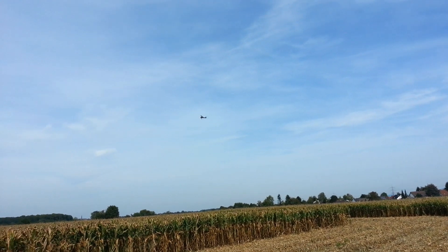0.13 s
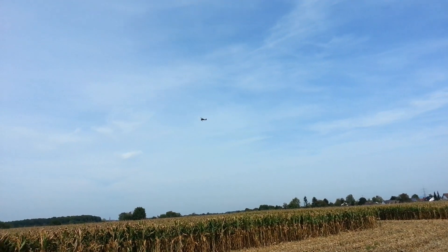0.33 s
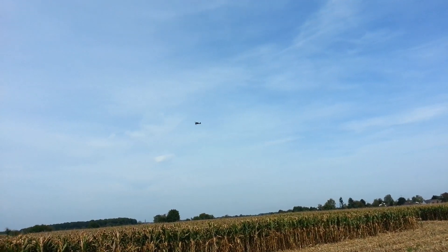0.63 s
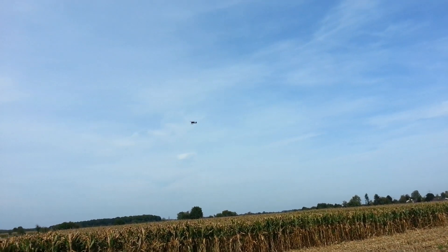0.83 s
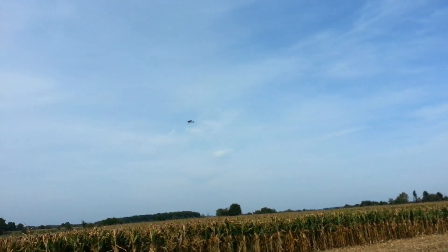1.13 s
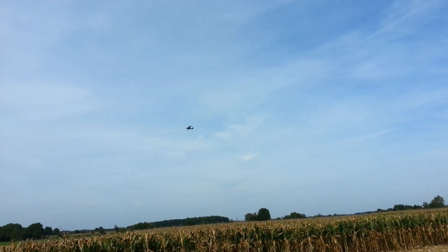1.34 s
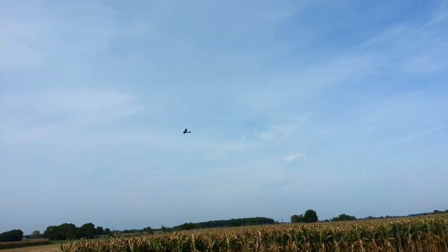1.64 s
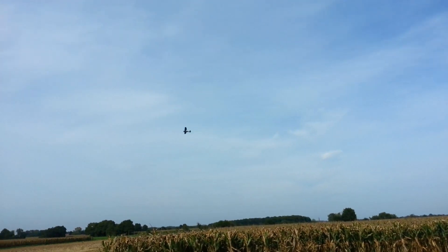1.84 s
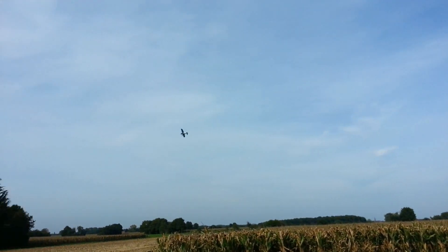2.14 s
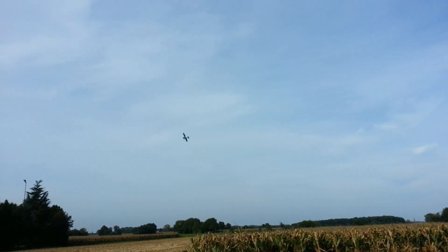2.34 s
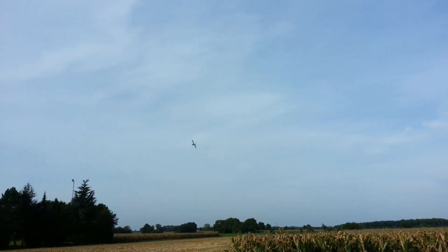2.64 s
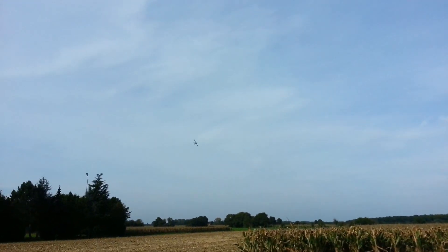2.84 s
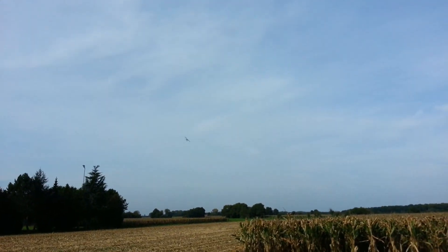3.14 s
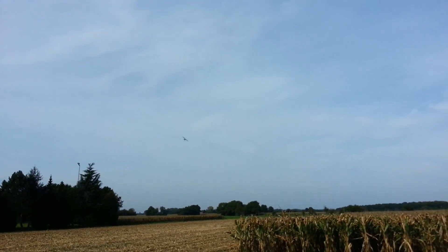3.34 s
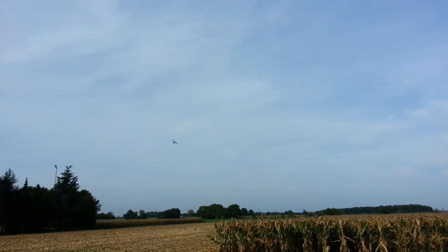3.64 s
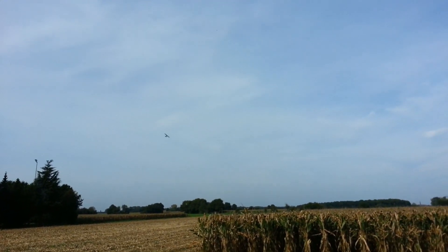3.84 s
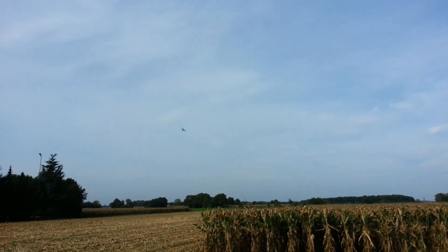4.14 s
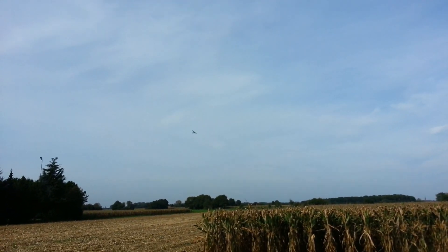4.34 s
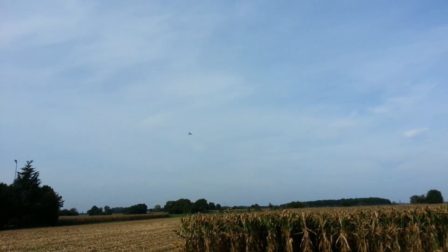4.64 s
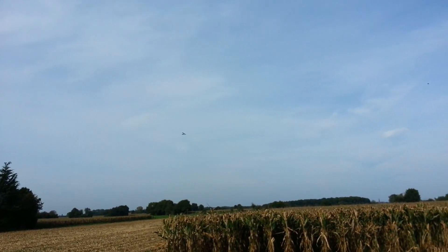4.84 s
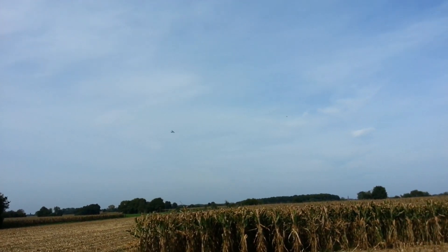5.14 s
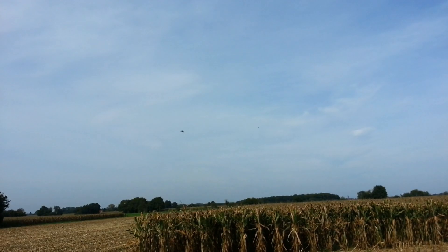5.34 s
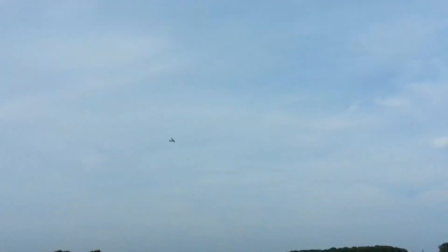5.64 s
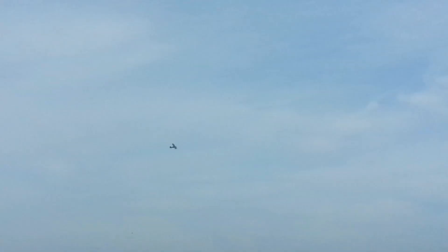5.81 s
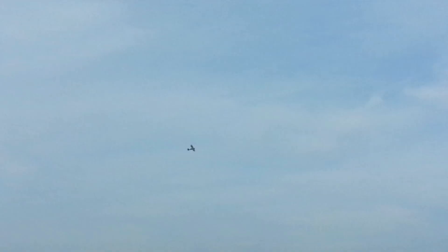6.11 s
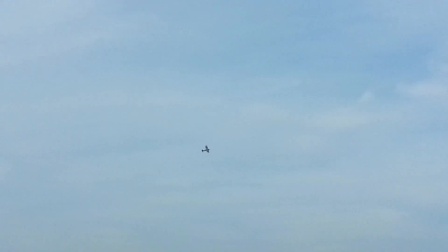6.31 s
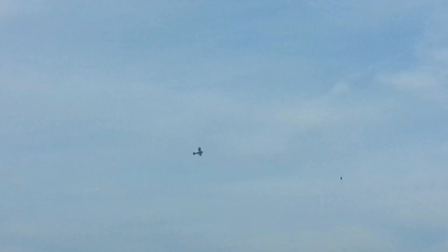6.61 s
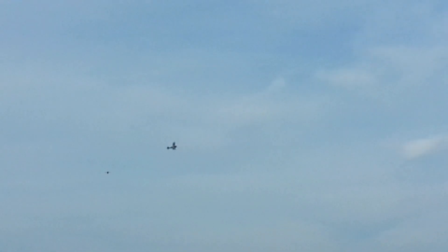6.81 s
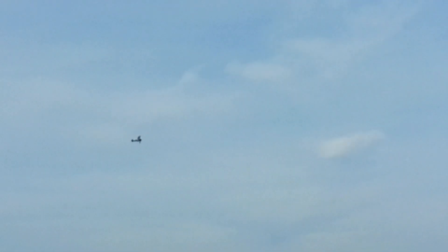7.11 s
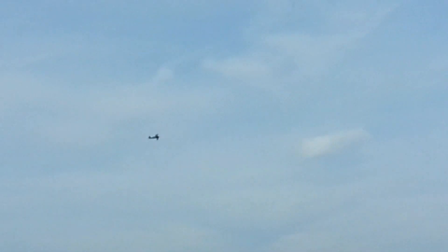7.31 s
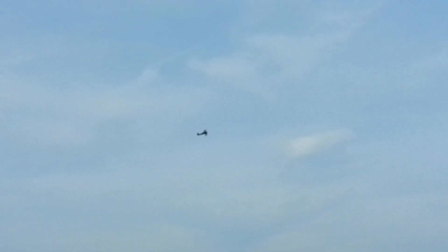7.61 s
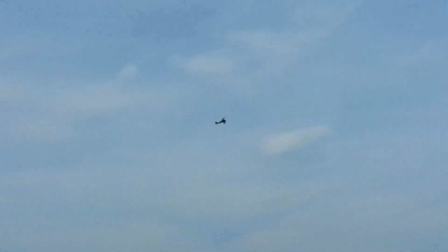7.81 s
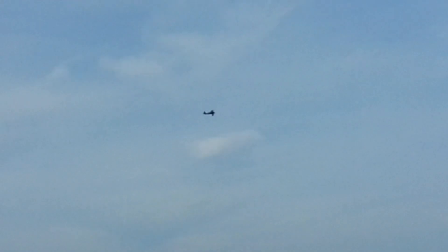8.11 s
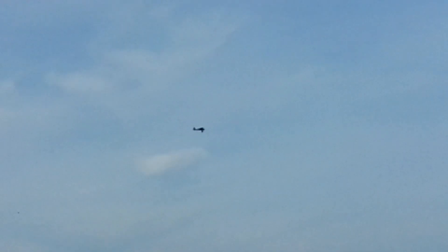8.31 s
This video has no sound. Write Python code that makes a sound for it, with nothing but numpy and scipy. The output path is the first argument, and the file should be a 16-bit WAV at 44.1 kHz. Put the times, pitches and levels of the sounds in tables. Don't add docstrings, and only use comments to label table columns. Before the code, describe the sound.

Outdoors over open fields, a small model plane approaches with a breathy, rushing roar. It swells from about two seconds, crackling sharply as it swings from right to left, then drops away. Hard finger clicks hit the camera shell just after the loudest moment, another knock follows, and low wind puffs thump mainly on the left while the distant roar thins and faint hiss emerges.

```python
import sys
import numpy as np
from scipy import signal
from scipy.fft import rfft, irfft, next_fast_len
from scipy.io import wavfile
from scipy.ndimage import uniform_filter1d, map_coordinates

SR = 44100
rng = np.random.default_rng(int(sys.argv[2]) if len(sys.argv) > 2 else 0)


def int16_out(signal):
    q = np.round(np.clip(np.atleast_2d(signal).T, -1, 1) * 32767)
    wavfile.write(sys.argv[1], SR, q.astype(np.int16))


def linear_from_db(decibels):
    return 10 ** (np.asarray(decibels, float) / 20)


N = 373086


def along(points, hz):
    f, *cols = np.transpose(points)
    return np.array([np.interp(np.log(hz + 1), np.log(f + 1), c) for c in cols])


def curves(rows, t=None):
    s, *cols = np.transpose(rows)
    t = np.arange(N) / SR if t is None else t
    return np.array([np.interp(t, s, c) for c in cols])


def unit(x):
    return x / np.sqrt(np.mean(x ** 2, axis=-1, keepdims=True) + 1e-20)


def wobble(rate):
    knots = rng.standard_normal(int(N * rate / SR) + 4)
    return map_coordinates(knots, [np.arange(N) * rate / SR])


def filtered(x, response):
    m = next_fast_len(N + SR // 2)
    return irfft(rfft(x, m) * response(np.fft.rfftfreq(m, 1 / SR)), m)[..., :N]


def coloured_noise(table):
    return filtered(rng.standard_normal((2, N)), lambda f: linear_from_db(along(table, f)[0]))


def modes(table):
    def response(f):
        return sum((-1) ** k * linear_from_db(db) * 1j * f * width / (c * c - f * f + 1j * f * width)
                   for k, (c, width, db) in enumerate(table))
    return response


def causal(gain):
    c = irfft(np.log(np.abs(gain) + 1e-6), axis=1)
    half = c.shape[1] // 2
    fold = np.r_[1, 2 * np.ones(half - 1), 1, np.zeros(half - 1)]
    return np.exp(rfft(c * fold[:, None], axis=1))


def pan(db):
    return linear_from_db(np.array([[.5], [-.5]]) * db)


# [t/s, level over the roar/dB, aftermath level/dB, aftermath t60/s]
EXHAUST_SHOCKS = [(0.869, 21, -6, 0.13), (1.693, 15, -18, .05), (1.729, 30, -19, .05), (1.761, 13, 0, 0.12),
                  (1.818, 22, -10, 0.074), (1.916, 27, -18, .05), (1.993, 20, -21, 0.043),
                  (2.035, 8, -24, 0.12), (2.097, 26, -13, .05), (2.318, 10, -18, .05), (2.371, 18, -9, .05),
                  (2.503, 29, -2.5, 0.15), (2.506, 22, -20, .05), (2.596, 17, -21, .1),
                  (2.7395, 19, -0.5, 0.15), (2.76, 27, -20, .1), (2.83, 28, -6, 0.11),
                  (2.8436, 29.5, -12, .15), (2.86, 29, -27, 0.092), (2.92, 18, -18, .1),
                  (3.852, 15, -12, 0.059), (6.484, 28, -25, 0.089), (6.516, 29, -4, .03)]


def turbulence():
    t = np.arange(N) / SR
    lull, lull_s = .55, .012
    shock_top_hz, aftermath_top_hz = 2600, 2500
    flicker = linear_from_db(0.027 * wobble(10) + 0.34 * wobble(30) + 1.02 * wobble(220))
    swell, spikes = np.ones(N), np.zeros(N)
    for s, db, after_db, t60 in EXHAUST_SHOCKS:
        away = np.abs(t - s)
        swell = swell * (1 + (t > s) * linear_from_db(after_db - 60 * away / t60))
        swell = swell * (1 - (t <= s) * lull * linear_from_db(after_db) * np.exp(-away / lull_s))
        spikes[round(s * SR)] = -linear_from_db(db)
    flow = unit(flicker * rng.standard_normal((3, N)))
    flow = flow + filtered((swell - 1) * flow, lambda f: 1 / (1 + (f / aftermath_top_hz) ** 8))
    cracks = filtered(spikes, lambda f: 1 / (1 + 1j * f / shock_top_hz) ** 3)
    return flow + cracks * [[1], [0], [0]]


def stage_weights(t, late):
    gone = np.clip(.5 - late / 5e-4, 0, 1)
    past, left, far = (np.clip((t - s) / span, 0, 1) for s, span in [(2.9, 0.33), (4.3, 0.44), (6.6, 0.83)])
    return [1 - gone, gone - past, past - left, left - far, far]


# [f/Hz, left level/dB, right level/dB]
COMING_COLOUR = [(59.6, -26, -23), (220, -9, -9.5), (427, -8.5, -9), (616, -10.5, -10), (700, -6, -5),
                 (860, -6.5, -5), (1210, 2, -2.5), (1360, -4.5, -9.5), (1720, -0.5, -2), (1850, 0, -3.5),
                 (2100, -9, -11.5), (2430, -17, -12.5), (2630, -24, -16.5), (2950, -13, -19),
                 (4440, -22, -18.5), (5300, -26, -22.5), (6100, -39, -30.5), (6700, -47, -28.5),
                 (7100, -40.5, -32.5)]
PASSING_COLOUR = [(60, -22, -24), (217, -7.5, -7), (600, -7, -7.5), (690, -5.5, -7.0), (1160, 0, 1.5),
                  (1260, -4, 1.5), (1340, -5.5, -3.5), (1550, -4, -5), (1850, -8.5, -9.5),
                  (2080, -9.5, -17), (2370, -15.5, -17.5), (2670, -17.5, -14), (2840, -16.5, -31.5),
                  (3750, -19.0, -21.5), (3880, -18, -23.5), (4520, -23.5, -26), (4840, -28, -34),
                  (5300, -32, -36.5), (7360, -49.5, -35.5)]
GOING_COLOUR = [ (60, -29.5, -29), (220, -6, -9), (430, -6, -6.5), (650, -6.5, -9.5), (850, -9.5, -7),
                (1070, -5, -0.5), (1210, -8, -3), (1410, -9, -10), (1670, -6, -7), (1920, -17.5, -8.5),
                (2260, -15, -14), (2660, -25, -22.5), (2800, -21, -25.5), (3260, -18, -25),
                (3620, -20.5, -23), (4120, -17.5, -24), (4500, -19.5, -36), (5000, -31, -36),
                (7050, -41, -44.5)]
LEAVING_COLOUR = [(60, -34.5, -31.5), (220, -9.5, -9.5), (340, -10.5, -7), (730, -7, -6.5),
                  (806, -14.5, -4.5), (1035, -1.5, -1.5), (1130, -6, -1.5), (1130, -4, -6),
                  (1620, -12.0, -8), (1770, -15.5, -9), (2760, -19.0, -20), (3010, -21, -28),
                  (3270, -19.5, -25), (4270, -20, -22.5), (4670, -20.5, -30.5), (4980, -26, -29),
                  (6100, -36, -31), (6800, -31, -29), (7360, -30.5, -32)]
FAR_COLOUR = [(60, -24, -37.5), (223, -16.5, -12.5), (676, -7.5, -8.5), (840, -9, -5.5), (1060, 3, 0.5),
              (1160, -4.5, -5.5), (1680, -13.5, -14.5), (1940, -14, -11), (2460, -18.0, -22.5),
              (2710, -20.5, -30.5), (2890, -13, -23.5), (3100, -21.5, -23.5), (3420, -24, -22.5),
              (3830, -19.5, -28.5), (4720, -24.5, -28), (6240, -47, -37), (6370, -45.5, -35),
              (6930, -42.5, -33), (7360, -48.5, -38.5)]
# [t/s, f/Hz]
ROAR_TOP = [(0, 7800), (1.6, 8700), (2.05, 7800), (2.3, 9200), (2.9, 8800), (3.2, 8000), (8.46, 8200)]


def port_colour(hz, t, weights):
    f = hz[:, None]
    colours = [COMING_COLOUR, PASSING_COLOUR, GOING_COLOUR, LEAVING_COLOUR, FAR_COLOUR]
    colour = causal(linear_from_db(sum(w * along(c, hz)[..., None] for w, c in zip(weights, colours))))
    colour = colour * (f / 70) ** 3 / (1 + (f / 70) ** 3)
    return colour / (1 + (f / curves(ROAR_TOP, t)) ** 18)


def hand_shade(f, t):
    overhead_s, span_s, shadow_hz = 2.19, 0.16, 1150
    return np.exp(-((t - overhead_s) / span_s) ** 2) / (1 + (shadow_hz / (f + 1)) ** 4)


# [delay/ms, left gain, right gain]
HAND_ECHOES = [(.38, 0.039, 0.039), (0.898, 0.14, 0.1), (1.448, .03, .1)]


def echoes(f, t):
    now = np.minimum(t * SR, N - 1).astype(int)
    drift = 1 + .05 * np.array([wobble(.8), wobble(.8)])[:, None, now]
    bounced = sum(np.array(gains)[:, None, None] * np.exp(-2j * np.pi * f * ms / 1000 * drift)
                  for ms, *gains in HAND_ECHOES)
    return 1 + f ** 2 / (f ** 2 + 2500 ** 2) * bounced


# [lowest f/Hz, highest f/Hz]
ROAR_BANDS = [(200, 450), (450, 2200), (2200, 5500), (5500, 8500)]
# [t/s, level/dB, edge/dB]
FLIGHT_LEVELS = [(0, -31.5, -1), (.75, -28, -2.5), (1.5, -26.5, 1), (1.73, -24, 1), (1.79, -20.5, -1),
                 (1.9, -22, -2), (2.06, -21.5, -5), (2.18, -23, -3), (2.42, -22, -1), (2.7, -21.5, -2.5),
                 (2.9, -19, -3), (3.14, -26.5, -1.5), (4.0, -29, 1), (4.2, -30, 1.5), (4.4, -28, 0.5),
                 (4.84, -30.5, -3), (5.4, -34.5, 0.5), (6.5, -35, -0.5), (7.3, -35, -0.5), (7.5, -35.5, -1),
                 (8.46, -39, -2)]
GROWL_LEVELS = [-13, -14.5, -13, -12, -13.5]
FIZZ_LEVELS = [-28, -28.5, -27.5, -29, -33.5]


def flight_gain(colour, hz, t, weights):
    body, edge = curves(FLIGHT_LEVELS, t)
    growl = sum(w * db for w, db in zip(weights, GROWL_LEVELS))
    fizz = sum(w * db for w, db in zip(weights, FIZZ_LEVELS)) + edge
    rush = -11.5 + edge
    levels = body + np.array([growl, 0 * t, rush, fizz])
    have = [np.abs(colour[:, (hz > lo) & (hz <= hi)] ** 2).sum(1).mean(0) / len(hz) for lo, hi in ROAR_BANDS]
    one_band = np.eye(len(ROAR_BANDS))
    share = along([(np.sqrt(lo * hi), *row) for (lo, hi), row in zip(ROAR_BANDS, one_band)], hz)
    return linear_from_db(share.T @ (levels - 10 * np.log10(have)))


# [f/Hz, share]
SHARED_ROAR = [(200, 0.97), (800, .97), (1100, .97), (1350, 0.94), (1700, 0.94), (2400, 0.94), (2800, 0.56),
               (3200, 0.78), (3600, 0.57), (4100, 0.86), (4800, 0.73), (5500, 0.5), (8000, 0.5)]


def at_ports(paths, hz, late, weights, shade):
    f = hz[:, None]
    scatter, passing_scatter = 0.48, 0.57
    alike = along(SHARED_ROAR, hz)[0][:, None] * (1 - scatter * shade)
    alike = alike * (1 - passing_scatter * weights[1] * f ** 2 / (f ** 2 + 2200 ** 2))
    delay = np.exp(-1j * np.pi * f * late * [[[1]], [[-1]]])
    return np.sqrt(alike) * paths[0] * delay + np.sqrt(1 - alike) * paths[1:]


# [f/Hz, width/Hz, level/dB]
DUCT_MODES = [(305.6, 34.5, 6), (357.5, 29, -4.5), (426, 56, -7.5), (1104, 266, -8.5)]


def duct(roar):
    doppler, turn_s, turn_span_s = .035, 1.65, 1.3
    coming, going = (filtered(roar, lambda f: 1 + modes(DUCT_MODES)(f / (1 + doppler * way)))
                     for way in (1, -1))
    turned = np.clip((np.arange(N) / SR - turn_s) / turn_span_s, 0, 1)
    return coming + turned * (going - coming)


# [t/s, left port late/ms, left-right level/dB]
PLANE_BEARING = [(0, 0.14, 1.5), (.8, 0.2, -0.5), (1.7, 0.2, -2.5), (2.0, 0.2, -1), (2.09, 0.21, -0.5),
                 (2.18, -0.18, 2.5), (2.32, -0.26, 0.5), (2.6, -0.34, 0.5), (3.2, -0.42, -1.5),
                 (4.2, -0.4, -1.5), (5.4, -0.43, 2), (5.8, -0.42, 2.5), (6.8, -.42, 0.5),
                 (8.46, -0.43, -1.5)]


def plane():
    hz, t, paths = signal.stft(turbulence(), SR, nperseg=1024)
    f = hz[:, None]
    late_ms, balance_db = curves(PLANE_BEARING, t)
    late = late_ms / 1000
    weights = stage_weights(t, late)
    shade = hand_shade(f, t)
    colour = port_colour(hz, t, weights) * linear_from_db(-30 * shade) * echoes(f, t)
    colour = colour * flight_gain(colour, hz, t, weights) * pan(balance_db)[:, None]
    heard = at_ports(paths, hz, late, weights, shade)
    patches = rng.standard_normal(paths.shape[1:])
    patches = uniform_filter1d(uniform_filter1d(patches, 12, 0), 12, 1)
    blurred = heard * colour * linear_from_db(1.03 * patches / patches.std())
    roar = signal.istft(blurred, SR, nperseg=1024)[1][:, :N]
    return duct(roar)


# [t/s, peak level/dB, left-right level/dB, knock level re peak/dB, knock left-right level/dB]
SHELL_CLICKS = [
    (3.1242, -6.5, 17, 0.5, -10),
    (3.1435, -9, -13, -1.5, -17),
    (3.41, -32, -17, -32, -10),
    (3.471, -21, -19, -32, 0),
    (4.368, -27, 9, -12, 2),
    (4.3757, -15.5, 11, 8, -8),
    (8.452, -33, 0, -30, 0),
]
# [f/Hz, width/Hz, level/dB]
LEFT_SHELL_MODES = [(2670, 560, 14), (5100, 860, 3), (7400, 1300, 5), (10800, 1200, 6), (14000, 1400, 2.5)]
# [f/Hz, width/Hz, level/dB]
RIGHT_SHELL_MODES = [(2300, 800, -1), (5230, 990, 11), (7960, 3200, 5.5), (11100, 1400, -1),
                     (13800, 1400, -12)]
# [f/Hz, width/Hz, level/dB]
KNOCK_MODES = [(2150, 710, 10.5), (490, 880, 6)]


def clicks():
    bright, dull = np.zeros((2, 2, N + SR))
    t = np.arange(600) / SR
    knock_late_s = .0006
    for s, db, side_db, knock_db, knock_side_db in SHELL_CLICKS:
        rattle = linear_from_db(-18 - 60 * t / 0.0024) * rng.standard_normal((2, len(t)))
        blow = (t == 0) + rattle
        bright[:, round(s * SR):][:, :len(t)] += linear_from_db(db + 5) * pan(side_db) * blow
        dull[:, round((s + knock_late_s) * SR):][:, :1] -= linear_from_db(db + knock_db + 11) * pan(knock_side_db)
    both_sides = (modes(LEFT_SHELL_MODES), modes(RIGHT_SHELL_MODES))
    shell = filtered(bright[:, :N], lambda f: np.array([side(f) for side in both_sides]))
    return shell + filtered(dull[:, :N], modes(KNOCK_MODES))


# [t/s, peak level/dB, left-right level/dB, f/Hz, t60/s]
SHELL_TICKS = [(1.849, -14, -6, 4370, 0.0033), (1.851, -31, -12, 7850, .003), (2.412, -36, 0, 6560, 0.0075),
               (2.439, -35, 0, 7400, .005), (2.533, -33.5, 1, 6900, .008), (3.1245, -12, 18, 10800, 0.0026),
               (3.1246, -12.5, -16, 4930, 0.0044), (3.1442, -30, 10, 4150, 0.0053),
               (3.1448, -16, -13, 3450, .006), (3.471, -31.5, 10, 11600, 0.0031),
               (3.8522, -14.5, 4, 2100, 0.0049), (4.3755, -19, 9, 3600, 0.0057),
               (4.076, -36, -14, 8700, 0.0035), (4.363, -41, 9, 9900, 0.0036),
               (4.484, -34, 11, 7600, 0.0016), (6.578, -45, 4, 7700, .004), (6.681, -26.5, 0, 2100, 0.015)]


def ticks():
    out = np.zeros((2, N + SR))
    t = np.arange(600) / SR
    for s, db, side_db, hz, t60 in SHELL_TICKS:
        swell = 1 - linear_from_db(-240 * t / t60)
        ring = linear_from_db(db + 2 - 60 * t / t60) * swell * np.sin(2 * np.pi * hz * t)
        out[:, round(s * SR):][:, :len(t)] += pan(side_db) * ring
    return out[:, :N]


# [t/s, length/s, level/dB, left-right level/dB]
FINGER_RUBS = [
    (1.617, 0.027, -54, 3),
    (4.37, 0.072, -47, 17),
    (8.13, 0.083, -49.5, 3),
]
# [f/Hz, level/dB]
RUB_COLOUR = [(2500, -18), (3400, -8), (4100, -5), (5200, -13), (6800, -16), (9500, -10.5), (14000, -13),
              (15500, -24)]


def rubs():
    strength = np.zeros((2, N + SR))
    for s, length, db, side_db in FINGER_RUBS:
        stroke = np.sin(np.linspace(0, np.pi, round(length * SR))) ** .7
        strength[:, round(s * SR):][:, :len(stroke)] += linear_from_db(db) * pan(side_db) * stroke
    return strength[:, :N] * unit(coloured_noise(RUB_COLOUR))


# [middle t/s, level/dB, hold/s, port]
WIND_GUSTS = [(4.15, -56, .1, 1), (4.383, -48, .02, 0), (4.494, -55, .02, 1), (4.81, -43, 0.022, 0),
              (5.27, -42.5, 0.017, 0), (5.4, -59, .02, 1), (5.644, -50, 0.2, 0), (6.325, -46.5, 0.03, 0),
              (6.726, -44, .03, 0), (7.132, -42.5, 0.37, 0), (7.54, -41.5, 0.06, 0), (7.72, -38, 0.027, 0),
              (7.756, -49, 0.098, 1), (7.894, -40, 0.023, 0), (8.112, -52, .03, 0), (8.344, -53, 0.11, 0)]
# [f/Hz, level/dB]
PUFF_COLOUR = [(20, -23), (40, -30), (90, -6.5), (170, -5.5), (300, -9.5), (480, -30), (900, -69),
               (2000, -120)]


def gusts():
    t = np.arange(N) / SR
    calm_db, fade_db_per_s = -75, 171
    lumps = linear_from_db(3.3 * np.array([wobble(35), wobble(23)]))
    puffs = filtered(lumps * rng.standard_normal((2, N)), lambda f: linear_from_db(along(PUFF_COLOUR, f)[0]))
    strength = np.full((2, N), linear_from_db(calm_db))
    for s, db, hold, port in WIND_GUSTS:
        outside = np.clip(np.abs(t - s) - hold / 2, 0, None)
        strength[round(port)] += linear_from_db(db - fade_db_per_s * outside)
    return strength * unit(puffs)


# [t/s, level/dB, port]
WIND_THUMPS = [(4.149, -16, 1), (4.488, -22, 1), (4.803, -33, 0), (5.28, -31, 0), (6.296, -38, 0),
               (6.728, -26, 0), (6.935, -39, 0), (7.012, -23, 0), (7.067, -18, 0), (7.19, -23, 0),
               (7.283, -31, 0), (7.33, -25, 0), (7.528, -11, 0), (7.676, -24, 0), (7.713, -20, 0),
               (7.729, -16, 0), (7.838, -25, 0), (7.931, -38, 0)]
# [f/Hz, width/Hz, level/dB]
PORT_MODES = [(191, 170, 4)]


def thumps():
    blows = np.zeros((2, N))
    for s, db, port in WIND_THUMPS:
        blows[int(port), round(s * SR)] = -linear_from_db(db + 27.5)
    return filtered(blows, lambda f: modes(PORT_MODES)(f) ** 2)


def unsteady_tone(hz):
    return np.sqrt(2) * np.sin(2 * np.pi * np.cumsum(hz) / SR)


# [t/s, level/dB]
HUM_LEVEL = [(0, -106), (2, -87), (2.45, -62), (3.5, -59.5), (4.4, -71), (5.2, -77), (8.46, -76)]


def hum():
    return linear_from_db(curves(HUM_LEVEL)) * unsteady_tone(65.5 + 1.44 * wobble(3.5))


# [t/s, f/Hz, level/dB]
FAR_FAN_TONE = [(6.2, 1125, -80), (6.8, 1182, -63), (8.46, 1202, -62)]


def far_fan():
    hz, db = curves(FAR_FAN_TONE)
    return linear_from_db(db) * unsteady_tone(hz + 5 * wobble(11))


# [t/s, level/dB]
WHINE_LEVEL = [(0, -73), (.7, -74), (1.2, -83), (3, -87), (7.9, -92), (8.25, -79), (8.46, -80)]


def whine():
    return linear_from_db(curves(WHINE_LEVEL)) * pan(-16) * unsteady_tone(7780 + 9 * wobble(36))


def scene():
    fingers = clicks() + ticks() + rubs()
    wind = gusts() + thumps()
    return plane() + fingers + wind + hum() + far_fan() + whine()


# [f/Hz, level/dB]
HISS_COLOUR = [(200, -21), (3000, -35), (6300, 0), (9000, 13.5), (13000, 11), (14800, 2.5), (16000, -13)]


def hiss(dry):
    duck, duck_from_db, duck_most_db = 1.7, -35.7, 11.5
    power = np.abs(uniform_filter1d(np.mean(dry ** 2, 0), SR // 4))
    loud_db = 10 * np.log10(power + 1e-9)
    duck_db = -np.clip(duck * (loud_db - duck_from_db), 0, duck_most_db)
    return linear_from_db(duck_db - 59) * unit(coloured_noise(HISS_COLOUR))


def low_pass(x):
    return signal.sosfilt(signal.butter(12, 14780, fs=SR, output="sos"), x)


def record(dry):
    heard = dry + hiss(dry)
    heard = heard / (1 + np.abs(heard / .8) ** 6) ** (1 / 6)
    return low_pass(heard)


dry = scene()
out = record(dry)
int16_out(out)
```